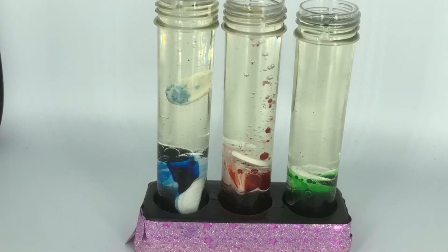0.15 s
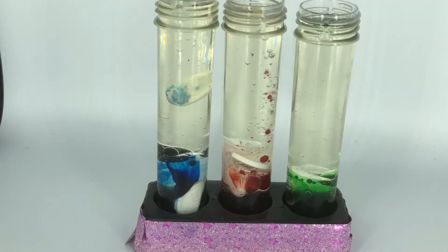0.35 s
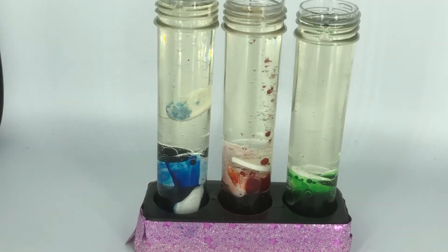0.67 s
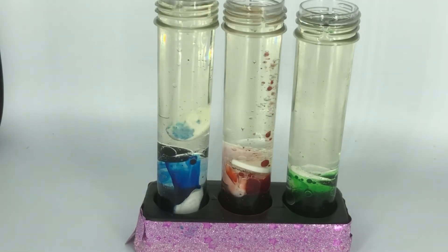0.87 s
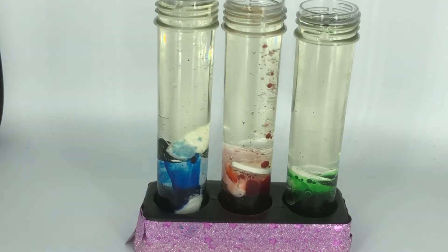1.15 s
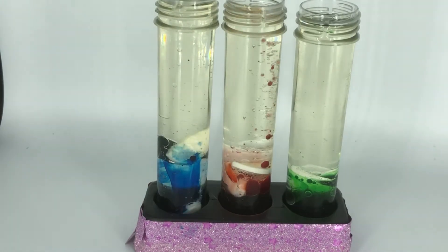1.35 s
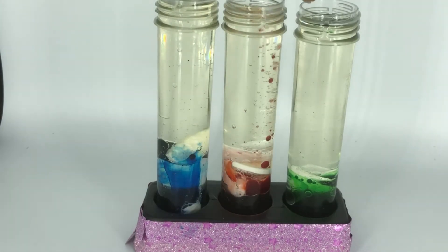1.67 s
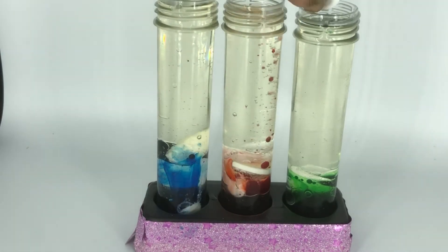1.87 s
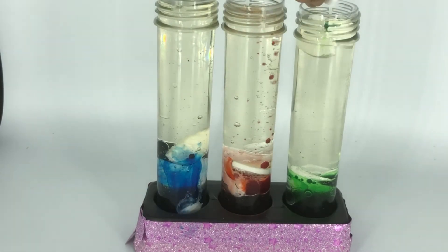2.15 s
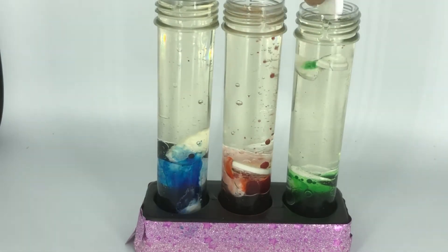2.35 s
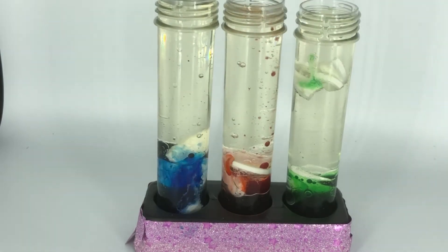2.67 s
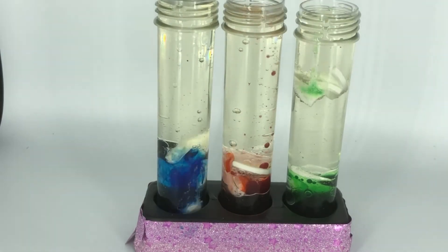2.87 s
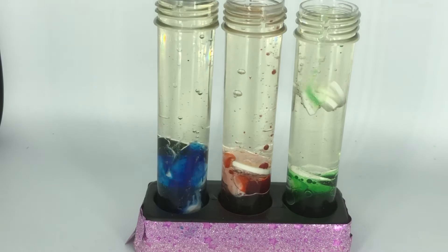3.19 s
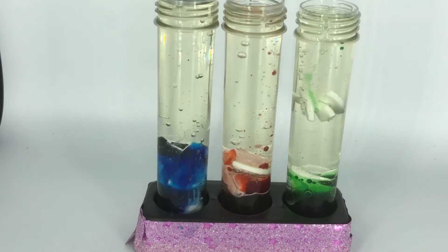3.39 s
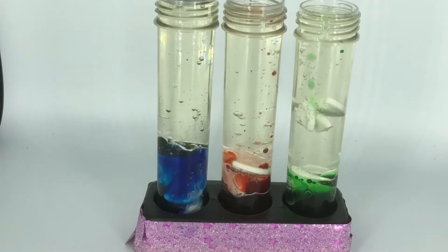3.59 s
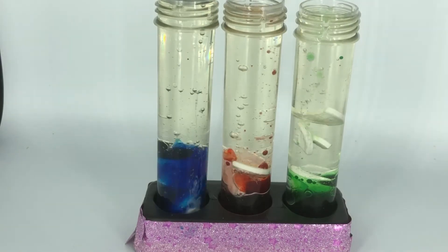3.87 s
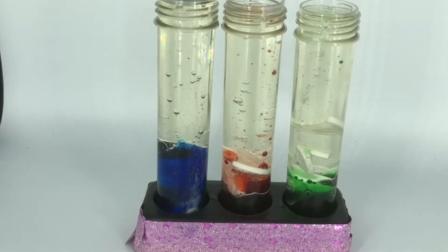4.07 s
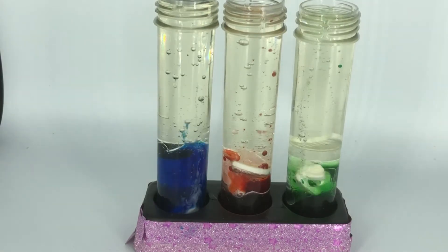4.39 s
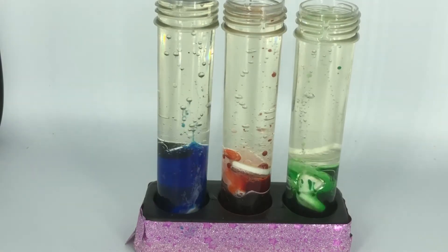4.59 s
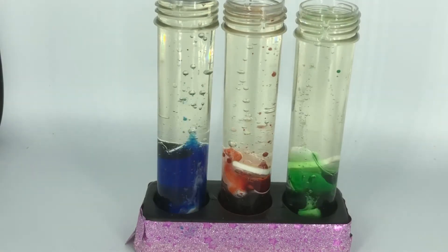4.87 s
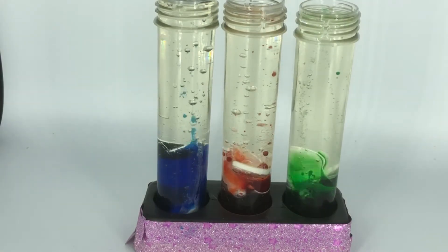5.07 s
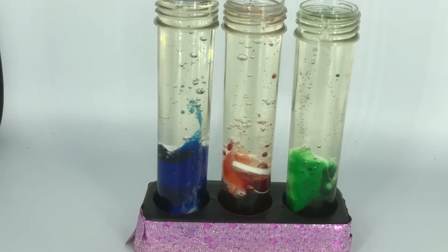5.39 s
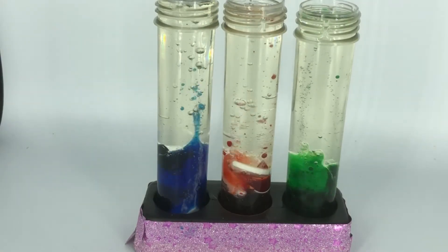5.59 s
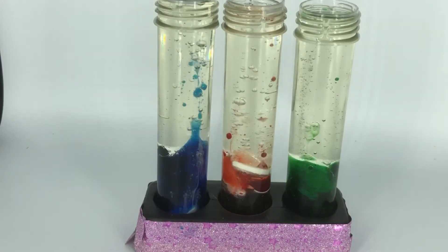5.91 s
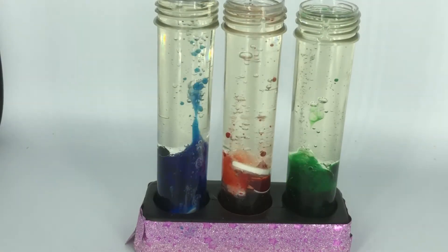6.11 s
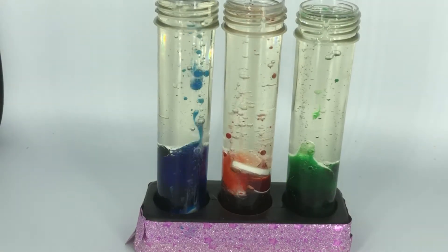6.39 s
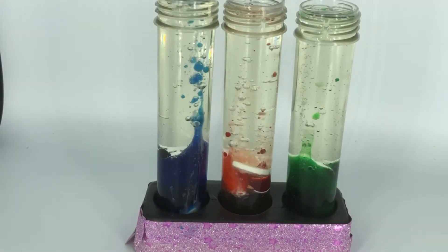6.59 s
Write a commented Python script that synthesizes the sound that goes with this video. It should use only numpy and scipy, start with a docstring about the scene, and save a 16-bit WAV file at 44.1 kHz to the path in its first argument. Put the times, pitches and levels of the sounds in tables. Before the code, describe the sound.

Foil crinkles, a plastic tube is tapped and things bump on a table as a soft effervescent fizz slowly grows.

```python
"""A faint fizz comes first: bubbles from effervescent tablets burst in plastic tubes of oil and water.
In the quiet room a foil wrapper rustles and snaps as its creases buckle. Tablet pieces tap the
mouth of a tube, exciting its modes, and the fizz grows. Things slide over the table with
stick-slip friction and are set down with hollow knocks; near the end a draught puffs once."""
import sys
import numpy as np
from scipy import signal
from scipy.fft import rfft, irfft, next_fast_len
from scipy.io import wavfile

SR = 44100
rng = np.random.default_rng(int(sys.argv[2]) if len(sys.argv) > 2 else 0)


def generate_wav(signal):
    """Clip the signal to [-1, 1] and save it as 16-bit WAV at the path in sys.argv[1]."""
    frames = np.transpose(np.atleast_2d(signal))
    scaled = np.clip(frames, -1, 1) * 32767
    pcm = np.round(scaled).astype(np.int16)
    wavfile.write(sys.argv[1], SR, pcm)


N = 297616
TIME = np.arange(N) / SR


def from_db(db):
    """Amplitude ratio of a level in decibels."""
    return 10 ** (np.asarray(db) / 20)


def rms_one(x):
    """Normalisation to unit rms."""
    return x / np.sqrt(np.mean(x ** 2) + 1e-20)


def at_hz(rows, hz, column=1):
    """Interpolation of a spectrum on a logarithmic frequency axis."""
    rows = np.array(rows)
    return np.interp(np.log(np.maximum(hz, 1)), np.log(rows[:, 0]), rows[:, column])


def coloured(x, spectrum):
    """Spectral shaping of a steady signal, at unit rms."""
    size = next_fast_len(N)
    hz = np.arange(size // 2 + 1) * SR / size
    return rms_one(irfft(rfft(x, size) * from_db(at_hz(spectrum, hz)), size)[:N])


def cut(x, hz, kind, order=2):
    """Butterworth filter."""
    return signal.sosfilt(signal.butter(order, np.clip(hz, 10, .45 * SR), kind, fs=SR, output="sos"), x)


def band(x, hz, width_hz):
    """Response of a single damped resonator."""
    return cut(x, hz + width_hz * np.array([-.5, .5]), "band", order=1)


def drift(knots_per_s):
    """Slow random modulation of unit rms."""
    knots = rng.standard_normal(N)
    return rms_one(np.interp(TIME * knots_per_s, np.arange(N), knots))


def grains(per_s, spread_db):
    """Shot noise: a Poisson train of impulses of random level and sign."""
    sizes = from_db(spread_db * np.minimum(rng.exponential(1, N), 4)) * rng.choice([-1, 1], N)
    return sizes * (rng.random(N) < per_s / SR)


def add(out, start_s, sound):
    """Superposition of a sound from a given time."""
    at = round(start_s * SR)
    out[at:at + len(sound)] += sound[:N - at]


def gestures(rows, t60, t60_per_s=0):
    """Incoherent addition: envelopes rise linearly, hold, decay exponentially and sum in power."""
    power = np.zeros(N)
    for start, attack_s, hold_s, db in rows:
        swell = np.clip((TIME - start) / attack_s, 0, 1)
        length = attack_s + hold_s
        released = np.maximum(TIME - start - length, 0) / (t60 + t60_per_s * length)
        power += (swell * from_db(db - 60 * np.minimum(released, 2))) ** 2
    return np.sqrt(power)


def struck(modes, t, travel_s, vary_db):
    """Damped normal modes; bending waves are dispersive, so the high ones arrive first."""
    hz, db, t60 = np.transpose(modes)[:, :, None]
    age = np.maximum(t - travel_s * np.sqrt(hz[0] / hz), 0)
    gain = from_db(db + vary_db * rng.standard_normal(hz.shape) - 60 * age / t60)
    return np.sum(gain * np.sin(2 * np.pi * hz * age), axis=0)


def dense_ring(rows, t):
    """High modal overlap: half-octave bands of noise, each decaying at its own rate."""
    edges = np.geomspace(90, 17000, 16)
    hz = np.fft.rfftfreq(len(t), 1 / SR)
    gain = from_db(at_hz(rows, hz)) * (hz >= edges[0]) * (hz < edges[-1])
    noise = rms_one(gain) * rfft(rng.standard_normal(len(t)))
    bands = irfft(noise * (hz >= edges[:-1, None]) * (hz < edges[1:, None]), len(t))
    t60 = at_hz(rows, np.sqrt(edges[:-1] * edges[1:]), column=2)
    return np.sum(bands * from_db(-60 * t / t60[:, None]), axis=0)


def fizz(fresh_tablets_s=1.8, build_s=5.4, calm_db=-68.5, lively_db=-54.5, tick_s=0.0022):
    """Shot noise of bursting bubbles: like-sized ones sizzle in narrow bands, a few larger ones tick."""
    # spectrum of the bursts: f/Hz, relative spectral level/dB
    burst_spectrum = [(1500, -3), (3500, -4), (5200, -0.5), (6200, -4.5), (7300, -0.5), (8900, -3.5),
                      (10500, 0), (13000, -1.5), (16000, -0.5)]
    # bands of like-sized bubbles: f/Hz, bandwidth/Hz, calm level/dB, lively level/dB
    sizzles = [(6120, 140, -83, -69), (8830, 350, -72, -71.5), (13000, 1100, -105, -63)]
    gas = np.clip((TIME - fresh_tablets_s) / build_s, 0, 1) ** 1.3
    bursts_per_s = 1000 + 7000 * gas
    fizz_db = 10 * np.log10((1 - gas) * from_db(calm_db) ** 2 + gas * from_db(lively_db) ** 2)
    spray = coloured(grains(bursts_per_s, spread_db=2.0) / np.sqrt(bursts_per_s), burst_spectrum)
    tick = rng.standard_normal(SR // 50) * np.exp(-TIME[:SR // 50] / tick_s)
    pops = signal.fftconvolve(grains(per_s=60, spread_db=4.5), tick)[:N]
    out = from_db(fizz_db) * (spray + from_db(-10) * coloured(pops, burst_spectrum))
    vigour = (fizz_db - fizz_db.min()) / np.ptp(fizz_db)
    for hz, width_hz, first_db, last_db in sizzles:
        sizzle = rms_one(band(grains(per_s=2000, spread_db=-3.0), hz, width_hz))
        out += from_db(first_db + vigour * (last_db - first_db)) * sizzle
    return out


def room_air(level_db=-54):
    """Ambient noise: stationary, Gaussian and strongest in the bass."""
    # room air: f/Hz, relative spectral level/dB
    air_spectrum = [(20, -32), (35, -17), (60, 0), (110, -3.5), (180, 1), (300, -5), (450, -10),
                    (900, -15.5), (2000, -23), (3500, -25.5), (8000, -27.5), (12000, -31), (16000, -36)]
    return from_db(level_db) * coloured(rng.standard_normal(N), air_spectrum)


def sliding(uneven_db=0.4, lumpy_db=2.5):
    """Stick-slip friction: a dense stream of small slips, over a lumpy rumble of the loaded table."""
    # things pushed over the table: start t/s, attack/s, hold/s, level/dB
    pushes = [(.085, 0.0096, 0.016, -59.5), (3.78, 0.12, 0.017, -51.5), (4.135, 0.07, .1, -47.5),
              (4.375, 0.017, 0.0092, -51), (4.55, .012, 0.014, -40.5), (5.275, 0.015, 0.028, -52),
              (5.57, 0.031, .008, -51.5), (5.86, 0.034, .012, -48.5), (6.11, 0.024, 0.059, -47),
              (6.18, 0.075, 0.042, -38.5), (6.615, 0.038, 0.064, -47)]
    # weight leaning on the table: start t/s, attack/s, hold/s, level/dB
    leans = [(.95, 0.13, 0.87, -55), (2.3, .1, 0.57, -54.5), (3.19, 0.024, 0.033, -45.5),
             (3.95, 0.13, 0.16, -40.5), (4.41, .05, .02, -50), (4.57, 0.054, .17, -44.5),
             (5.5, 0.042, 0.043, -45), (6.02, 0.077, .1, -44), (6.33, .05, 0.14, -48),
             (6.65, .07, .03, -46)]
    # friction noise: f/Hz, relative spectral level/dB
    rub_spectrum = [(150, -5), (350, -4.5), (620, -5), (1150, -3), (1900, -7.5), (2700, -6), (4500, -7),
                    (7500, -11.5), (11000, -15.5), (16000, -28)]
    # rumble of the table: f/Hz, relative spectral level/dB
    rumble_spectrum = [(40, -19), (80, -7.5), (125, 0), (170, 5), (260, -1.5), (340, -9), (450, -8.5),
                       (700, -21.5), (1500, -25), (4000, -46)]
    slips = grains(per_s=14000, spread_db=-2.0) * from_db(uneven_db * drift(60))
    rub = coloured(slips, rub_spectrum)
    rumble = coloured(rng.standard_normal(N) * from_db(lumpy_db * drift(25)), rumble_spectrum)
    motion = gestures(pushes, t60=0.23, t60_per_s=2.2)   # a longer push coasts longer
    return motion * rub + gestures(leans, t60=0.64) * rumble


def wrapper(crack=1.03, crack_s=0.0021, small_edge_hz=4000):
    """Buckling of foil creases: single sharp snaps, and under each squeeze small snaps and a rustle."""
    # single snaps: t/s, level/dB, lower edge f/Hz
    snaps = [(.3612, -53, 6000), (.949, -48, 6000), (1.101, -35, 5500), (1.204, -37, 3500),
             (1.215, -36, 4000), (1.253, -41, 3000), (1.2856, -30, 6300), (1.316, -39, 3000),
             (1.324, -35.5, 4000), (1.392, -45, 2982), (1.4060, -27, 5370), (1.42, -31.5, 5500),
             (1.448, -37.5, 3000), (1.4956, -47, 5000), (1.518, -39, 3000), (1.524, -32.5, 3020),
             (1.5540, -36.5, 3500), (1.5868, -40.5, 2000), (1.613, -45, 1500), (1.6271, -24, 6570),
             (2.4539, -45.5, 3000), (2.4739, -50, 3500), (2.5081, -37.5, 4500), (2.5435, -32, 4330),
             (2.5971, -46, 4000), (2.656, -50, 4000), (2.661, -41, 4000), (2.705, -38.5, 5000),
             (2.7657, -43.5, 3480), (2.823, -49, 2500), (2.9207, -40.5, 4900), (3.0313, -45, 6000)]
    # ring of the foil: f/Hz, relative spectral level/dB, T60/s
    foil_ring = [(500, 12.5, 0.071), (2390, 2, 0.055), (4370, -2.5, 0.035), (6660, 1, 0.08),
                 (10000, -1.5, 0.082), (13000, -1, 0.087), (16000, -4, 0.069)]
    # squeezes of the wrapper: start t/s, attack/s, hold/s, level/dB
    squeezes = [(.933, 0.011, 0.97, -52), (1.0, 0.11, 0.18, -47.5), (1.39, .04, .02, -53),
                (1.51, .02, 0.13, -52), (2.44, 0.066, 0.06, -54), (2.62, 0.022, 0.38, -57.5),
                (2.79, 0.038, 0.018, -48)]
    # rustle of tiny creases: f/Hz, relative spectral level/dB
    rustle_spectrum = [(200, 5.5), (650, -2), (980, 6.5), (1400, -2.5), (2200, -4.5), (3300, -3),
                       (4700, -2), (7500, -7.5), (11000, -7), (16000, -14)]
    out, t = np.zeros(N), TIME[:SR // 7]
    sharp_onset = 1 + crack * np.exp(-t / crack_s)
    for start_s, db, edge_hz in snaps:
        add(out, start_s, from_db(db) * cut(dense_ring(foil_ring, t) * sharp_onset, edge_hz, "high"))
    squeeze = gestures(squeezes, t60=0.16)
    rustle = coloured(grains(per_s=10000, spread_db=3.0) * from_db(1.3 * drift(70)), rustle_spectrum)
    small_snap = from_db(1) * cut(dense_ring(foil_ring, t) * sharp_onset, small_edge_hz, "high")
    out += signal.fftconvolve(squeeze * grains(per_s=20, spread_db=1), small_snap)[:N]
    return near_echoes(out) + squeeze * rustle


def near_echoes(x):
    """Comb filtering: early reflections interfere with the direct sound; broadband power is kept."""
    # reflections from the table top and the backdrop: delay/s, amplitude ratio
    echoes = [(.0009, .4), (.0028, .45), (.0037, -.3)]
    out = x.copy()
    for delay_s, gain in echoes:
        add(out, delay_s, gain * x)
    return out / np.sqrt(1 + sum(gain ** 2 for _, gain in echoes))


def taps(lowest_hz=240):
    """Impact excitation: hard tablet pieces ring a plastic tube too small to radiate bass."""
    # impacts: t/s, level/dB, contact cutoff f/Hz, relative level of the dense ring/dB
    impacts = [(2.0844, -45.5, 9000, 7.5), (2.0879, -51.5, 8000, 11.5), (2.3195, -29.5, 6000, -2.5),
               (2.3365, -42.5, 1800, 4), (2.4257, -48.5, 1200, 9.5), (3.983, -51, 3500, 4.5)]
    # modes of the tube in its rack: f/Hz, relative level/dB, T60/s
    tube_modes = [(502, -14, .07), (567, -16, .07), (685, -16, .06), (871, -10, .07), (1364, 0, .065),
                  (1489, 0, .065), (1652, -6, .04), (1917, -7, .045), (2380, -10, .03), (2787, -3, .035),
                  (3050, -4, .015)]
    # dense ring of the tube: f/Hz, relative spectral level/dB, T60/s
    tube_ring = [(200, -27, 0.091), (526, 6.5, 0.081), (1080, -4.5, 0.042), (1480, 1.5, 0.033),
                 (2140, -11, 0.017), (2900, -7, 0.017), (4000, -17, 0.045), (5500, -13, 0.13),
                 (7500, -22, 0.055), (9300, -11.5, 0.031), (16100, -28, .04)]
    out, t = np.zeros(N), TIME[:SR // 5]
    for start_s, db, contact_hz, ring_db in impacts:
        modes = struck(tube_modes, t, travel_s=.0015, vary_db=.8)
        ring = from_db(ring_db) * dense_ring(tube_ring, t)
        add(out, start_s, from_db(db) * cut(modes + ring, contact_hz, "low", order=1))
    return cut(out, lowest_hz, "high")


def knocks(rise_s=0.003, thud_t60=0.17, rebound_s=.031, rebound_db=-9.0, rebound_hz=900, radiate_hz=114):
    """Free vibration of a plate: each blow thuds, booms the table, rattles its load and rebounds once."""
    # blows: t/s, boom level/dB, clatter level/dB, contact cutoff f/Hz, clatter length factor,
    # thud f/Hz, thud level/dB
    blows = [(3.197, -39, -38, 1320, 0.69, 319, -38), (3.643, -42.5, -41, 1320, 1.1, 238, -34.5),
             (3.941, -41.5, -57, 446, 1.0, 223.4, -26.5), (4.06, -35, -36.5, 870, 1.3, 132.5, -22),
             (4.125, -34.5, -37.5, 910, 1.1, 285, -29), (4.136, -47, -36, 400, 1, 140.7, -23),
             (4.771, -58, -41, 900, 0.36, 260, -44), (5.390, -18.5, -20.5, 6800, 1.13, 207, -30),
             (5.856, -55, -46.5, 497, 2.7, 264, -42), (6.126, -37.5, -42, 600, 0.82, 153, -29),
             (6.252, -22, -24, 2550, 1.2, 450.4, -24)]
    # modes of the table: f/Hz, relative level/dB, T60/s
    table_modes = [(143.2, 1, 0.28), (173.2, 3.5, 0.19), (201.9, 2, 0.24), (232.2, -3.5, 0.26),
                   (266.3, -9.5, 0.26), (288, -9, 0.13), (319, -13, .25), (363, -12.5, 0.32),
                   (457.4, -3, 0.22), (506, -3, 0.16), (666, -11, 0.24), (690, -11, 0.26), (760, -17, 0.39),
                   (802, -15.5, 0.22), (977, -15.5, 0.35), (1194, -15, 0.33), (1343, -16, 0.16),
                   (1455, -16, .24)]
    # clatter of what stands on the table: f/Hz, relative spectral level/dB, T60/s at length factor 1
    load_ring = [(100, -14, 0.4), (246, 5, 0.23), (337, 2, 0.3), (487, -4.5, 0.34), (1160, -5, 0.3),
                 (1930, -14.5, 0.3), (2680, -12.5, 0.29), (4760, -13.5, 0.27), (8000, -19.5, 0.23),
                 (16000, -22, .17)]
    out, t = np.zeros(N), TIME[:SR // 2]
    rise = 1 - np.exp(-t / rise_s)
    for start_s, boom_db, clatter_db, contact_hz, stretch, thud_hz, thud_db in blows:
        boom = from_db(boom_db - 1.5) * struck(table_modes, t, travel_s=0.00698, vary_db=2.5)
        clatter = from_db(clatter_db) * dense_ring(load_ring, t / stretch) * rise
        thud = struck([(thud_hz, thud_db, thud_t60)], t, travel_s=0, vary_db=1.0) * rise
        add(out, start_s, thud + cut(boom + clatter, contact_hz, "low", order=1))   # soft contact is dull
        add(out, start_s + rebound_s, from_db(rebound_db) * cut(clatter, rebound_hz, "low"))
    return cut(out, radiate_hz, "high", order=6)   # a small panel radiates no deep bass


def scrapes(quality_factor=5.3):
    """Friction-driven resonance: a sliding edge catches briefly and its slips ring at one pitch."""
    # catches of an edge: centre t/s, duration/s, resonance f/Hz, level/dB
    catches = [(3.846, 0.053, 1750, -51.5), (3.86, 0.13, 905, -52.5), (3.915, 0.044, 2590, -54),
               (3.987, 0.012, 2500, -52.5), (4.342, 0.031, 1730, -49.5), (4.399, 0.047, 2630, -52),
               (5.907, 0.067, 1200, -50.5), (6.173, 0.077, 140, -40.5), (6.216, 0.059, 1080, -41.5)]
    out = np.zeros(N)
    for centre_s, length_s, hz, db in catches:
        swell = np.exp(-np.pi * ((TIME - centre_s) / length_s) ** 2)
        slips = grains(per_s=2500, spread_db=2.0)
        out += from_db(db) * swell * rms_one(band(slips, hz, hz / quality_factor))
    return out


def draught():
    """Pressure fluctuations in one puff of moving air, heard as a deep rumble."""
    # the puff: start t/s, attack/s, hold/s, level/dB
    puff = [(5.54, .05, 0.21, -51.5)]
    # its pressure fluctuations: f/Hz, relative spectral level/dB
    puff_spectrum = [(15, -35), (25, -20), (36, 6), (55, 7), (80, -6), (160, -50), (400, -90)]
    return gestures(puff, t60=.18) * coloured(rng.standard_normal(N), puff_spectrum)


def reverberation(x, t60=0.23, wall_hz=5000, first_echo_s=0.014):
    """Diffuse field: reflections from the walls merge into a slightly dull, exponential tail."""
    t = TIME[:SR // 2]
    reflections = cut(rng.standard_normal(len(t)), wall_hz, "low", order=1)
    tail = reflections * from_db(-60 * t / t60) * (t > first_echo_s)
    return signal.fftconvolve(x, tail / np.sqrt(np.sum(tail ** 2)))[:N]


def scene():
    """Superposition of the sounds on the table, the air and the reverberant field, in one channel."""
    near = knocks() + taps() + sliding() + wrapper() + scrapes() + fizz()
    return (near + room_air() + draught() + from_db(-23.5) * reverberation(near))[None]


def record(dry, cutoff_hz=15800):
    """Band limiting: an elliptic low-pass cuts the highest treble steeply."""
    return signal.sosfilt(signal.ellip(12, .1, 80, cutoff_hz, fs=SR, output="sos"), dry)


dry = scene()
out = record(dry)
generate_wav(out)
```